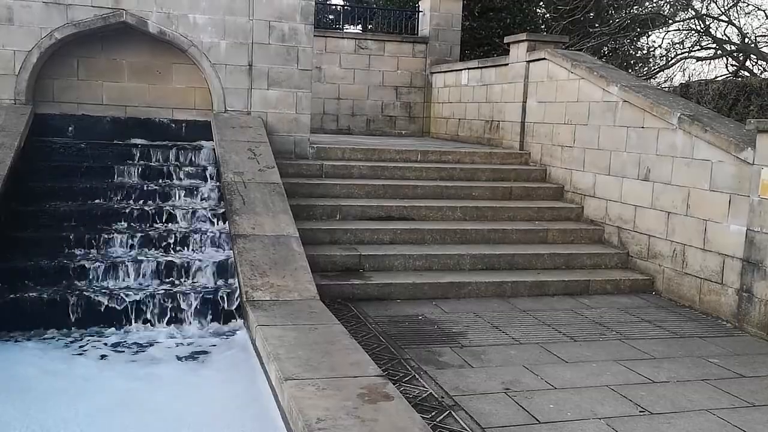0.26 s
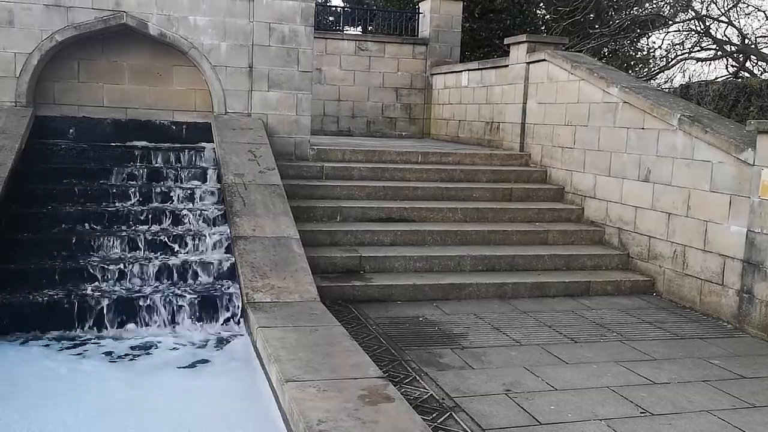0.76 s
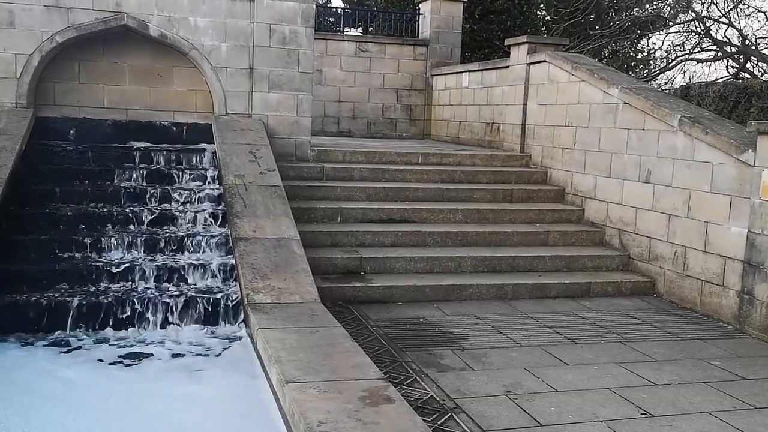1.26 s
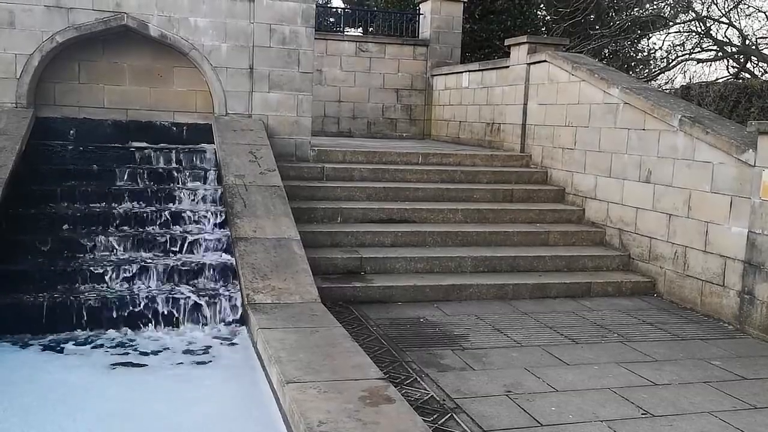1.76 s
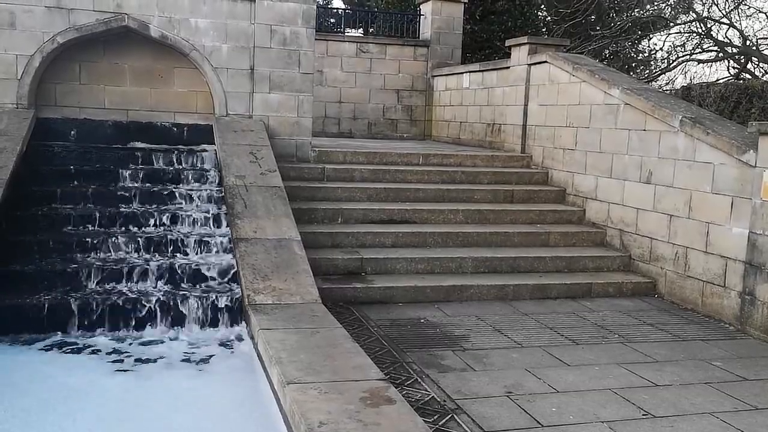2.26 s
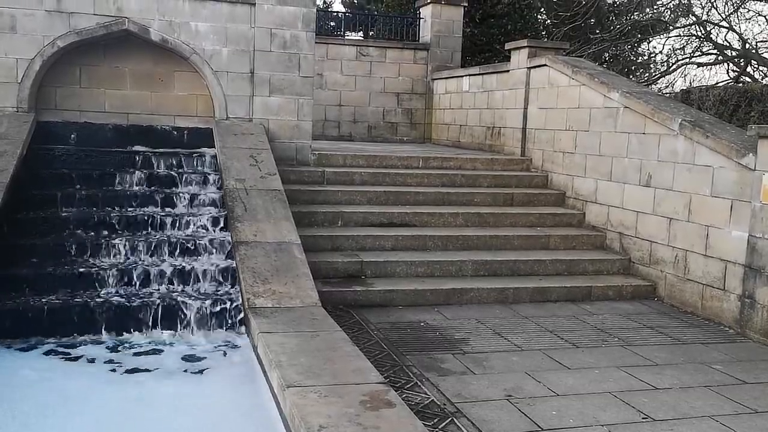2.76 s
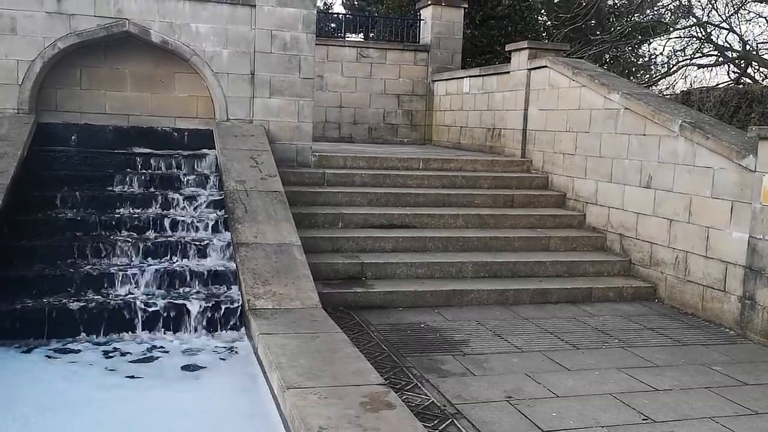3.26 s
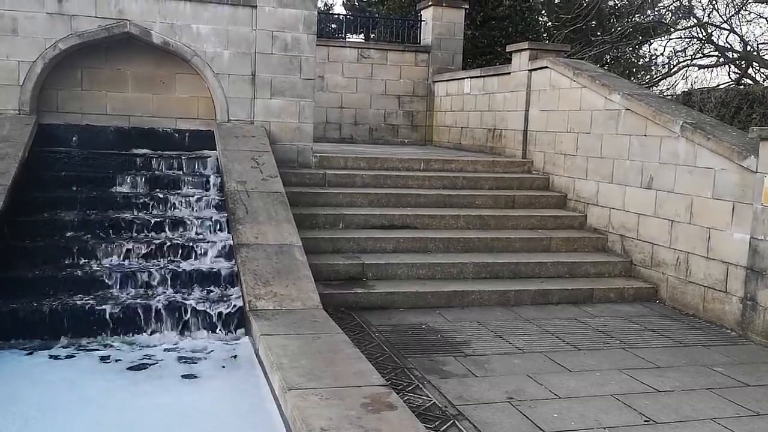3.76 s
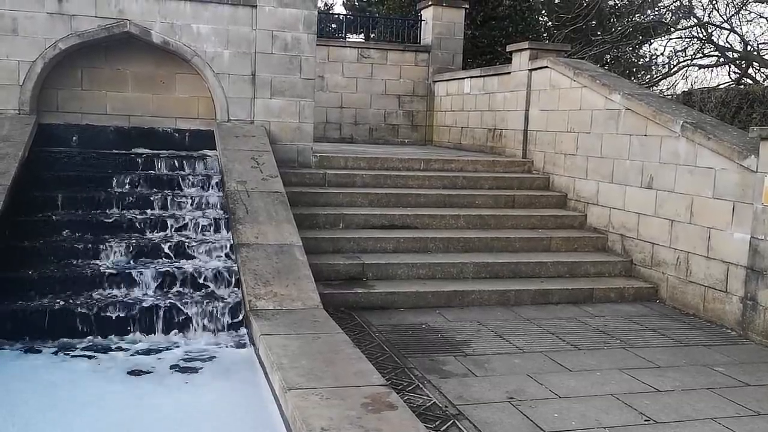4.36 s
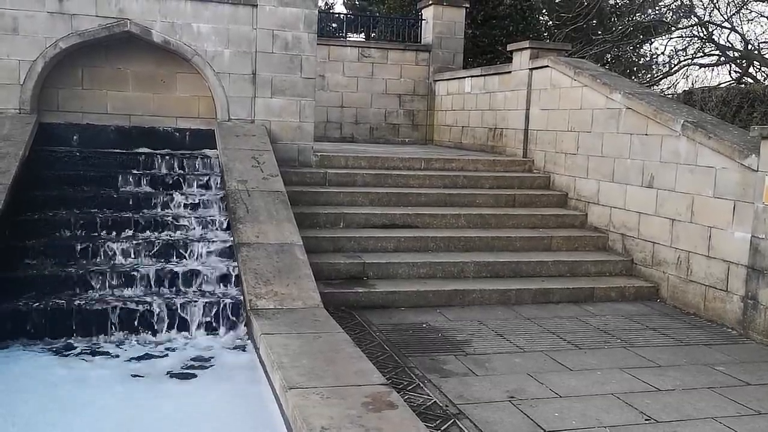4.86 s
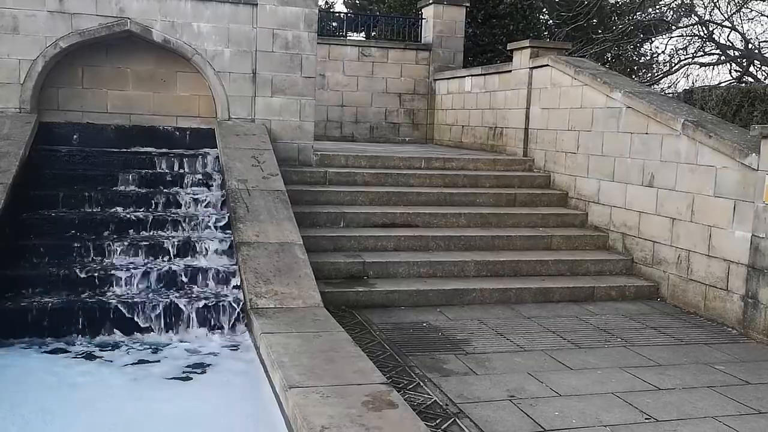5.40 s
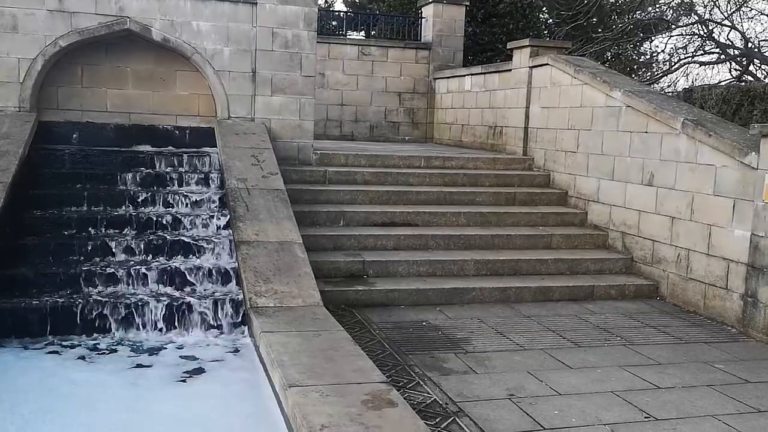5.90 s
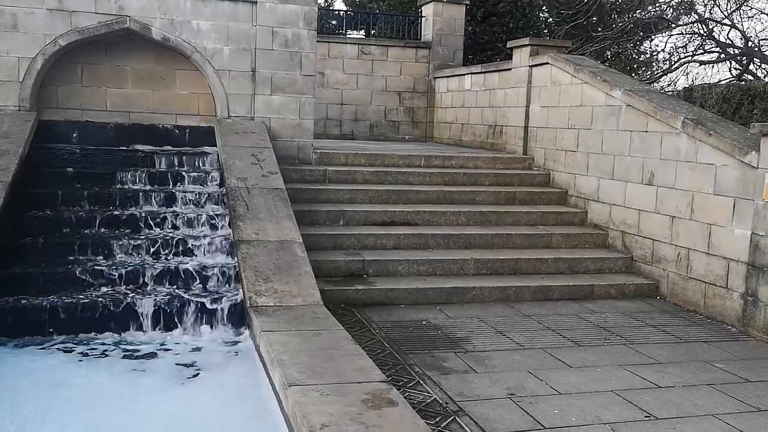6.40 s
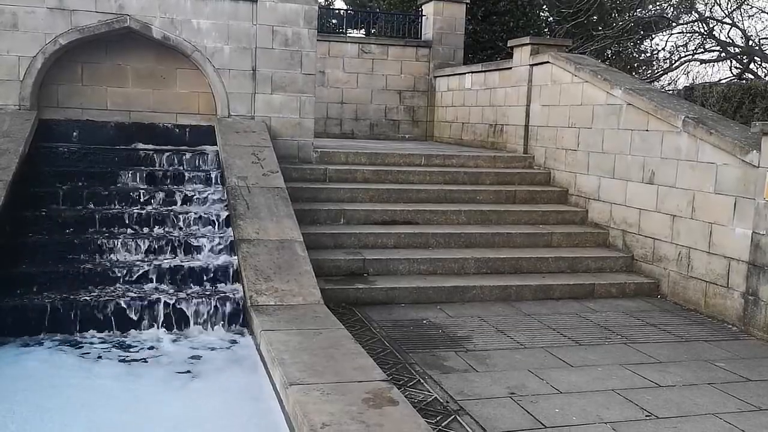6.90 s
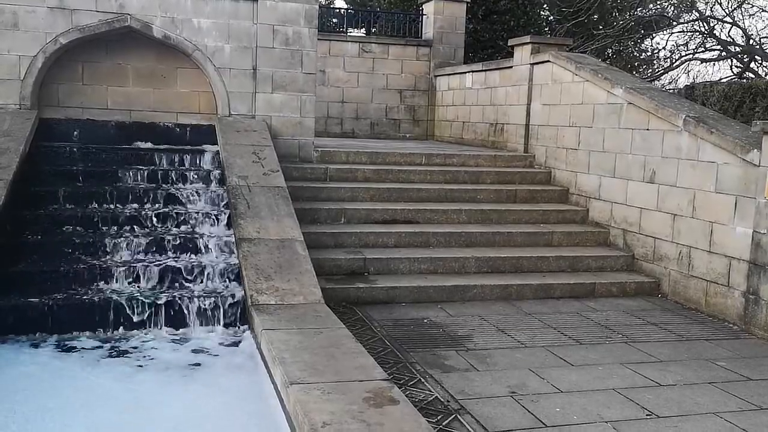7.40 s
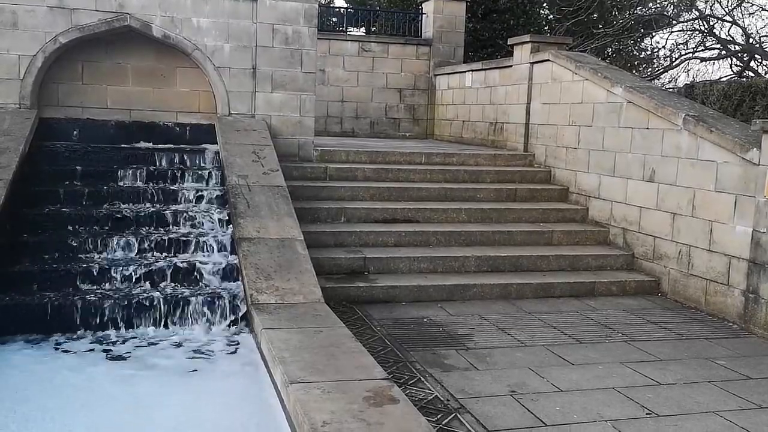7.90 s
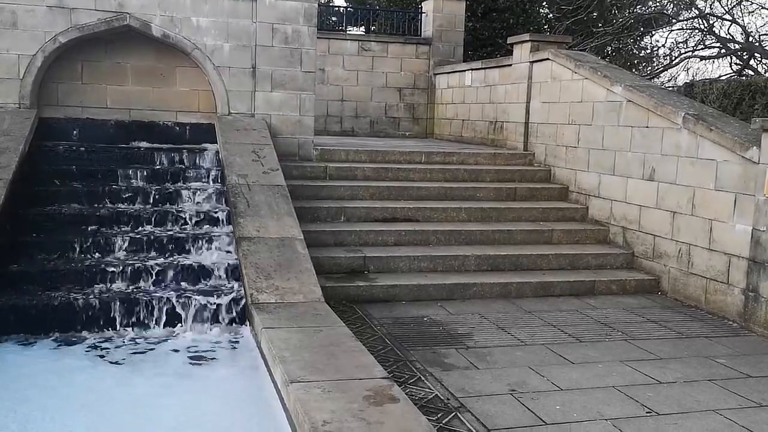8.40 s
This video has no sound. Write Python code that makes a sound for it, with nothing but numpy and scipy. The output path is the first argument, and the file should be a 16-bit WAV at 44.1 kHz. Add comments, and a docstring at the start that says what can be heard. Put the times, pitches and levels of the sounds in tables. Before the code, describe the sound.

Continuous splashing from a stepped fountain fills a wide stereo picture, lively in the mids, its highest treble softened. Single drops ring left and right. Low outdoor rumble, bumps of wind on the microphone and a few faint far knocks sit below. Three muffled, evenly spaced booms echo across the distance, momentarily ducking the water; very faint low hums appear from the third second on.

```python
"""A walled outdoor courtyard, where water tumbles down a flight of stone steps into a pool.
The cascade sums swarms of ringing bubbles, spray ticks and smooth wash; nearer drops splash and ring over it.
Filtered noise makes the low rumble; brief low swells make the puffs of breeze and the soft thuds.
Three dull far-off booms, about evenly spaced, swing, echo and roll; faint far hums set in later.
Loud moments pull down the recorder's gain, so it dips at the booms; the extreme treble is cut."""
import sys
import numpy as np
from scipy import signal
from scipy.fft import rfft, irfft, next_fast_len
from scipy.io import wavfile
from scipy.ndimage import uniform_filter1d

SR = 44100
rng = np.random.default_rng(int(sys.argv[2]) if len(sys.argv) > 2 else 0)


def bounce(signal):
    """Save signal as a 16-bit WAV file at the path given by the first command-line argument."""
    frames = np.transpose(np.atleast_2d(signal))
    limited = np.clip(frames, -1, 1)
    pcm = np.round(limited * 32767).astype(np.int16)
    wavfile.write(sys.argv[1], SR, pcm)


N = 381465
TIME = np.arange(N) / SR   # s


def from_db(db):
    """Amplitude ratio: twenty decibels are a factor of ten."""
    return 10 ** (np.asarray(db) / 20)


def rms_one(x):
    """Normalisation: scale the signal to unit root-mean-square."""
    return x / np.sqrt(np.mean(x ** 2) + 1e-20)


def in_time(rows):
    """Linear interpolation: a table over time, read at every sample."""
    return np.interp(TIME, *np.transpose(rows))


def per_bin(points):
    """Interpolation on a logarithmic frequency axis: a table over frequency, read at every FFT bin."""
    hz, value = np.transpose(points)
    bins_hz = np.fft.rfftfreq(next_fast_len(N), 1 / SR)
    return np.interp(np.log(bins_hz + 1e-3), np.log(hz), value)


def shaped(x, response):
    """Convolution theorem: filter by multiplying the spectrum by a response given per FFT bin."""
    size = next_fast_len(N)
    return irfft(rfft(x, size) * response, size)[..., :N]


def butter(x, hz, kind, order=2):
    """Butterworth filter: maximally flat in its passband."""
    corners_hz = np.clip(hz, 10, .45 * SR)
    return signal.sosfilt(signal.butter(order, corners_hz, kind, fs=SR, output="sos"), x)


def drift(rate):
    """Smooth random wander: noise low-passed at rate (Hz), with unit rms."""
    step = 40   # samples between the points of the slow curve
    r = np.exp(-2 * np.pi * rate * step / SR)
    white = rng.standard_normal(N // step + 2002)
    slow = signal.lfilter([1], [1, -2 * r, r * r], white)[2000:]   # drop the filter's settling
    return np.interp(np.arange(N) / step, np.arange(len(slow)), rms_one(slow))


def ring(clicks, hz, t60):
    """Damped resonance: each click starts an oscillation that falls by 60 dB in t60 seconds."""
    r = from_db(-60 / (t60 * SR))
    w = 2 * np.pi * hz / SR
    return signal.lfilter([1, 0, -1], [1, -2 * r * np.cos(w), r * r], clicks + 1e-18)


def even_noise(x, size):
    """Envelope division: take the slow level changes out of a noise, leaving rms near 1."""
    return x / np.sqrt(uniform_filter1d(x ** 2, size=size) + 1e-12)


def swell(s, db, hz, half_length_s, waver):
    """Gaussian wave packet: a few low swings, their phase wavering (in turns), rise and fall smoothly."""
    t = TIME[:SR] - .5
    unevenness = np.interp(t * hz, np.arange(-100, 100), rng.standard_normal(200))
    turns = hz * t + waver * unevenness
    envelope = np.sqrt(2) * from_db(db) * np.exp(-.5 * (t / half_length_s) ** 2)
    wave = envelope * np.cos(2 * np.pi * turns)
    return np.interp(TIME, s + t, wave, left=0, right=0)


def bubbles(per_s, spread_db, cycles, clump_db, clumps_per_s, count=26):
    """Resonance sets pitch by size: a swarm with small bubbles more numerous, even power per Hz, rms 1."""
    pitches = np.geomspace(350, 14000, count)
    shares = pitches ** .8 / np.sum(pitches ** .8)
    out = np.zeros(N)
    for hz, share in zip(pitches, shares):
        born = int(per_s * share * N / SR) + 1
        at, chance, sign = rng.random((born, 3)).T
        # each pitch has clumps of its own
        clumps = rng.standard_normal(int(clumps_per_s * N / SR) + 1)
        clump = clumps[(at * len(clumps)).astype(int)]
        sizes_db = spread_db * np.minimum(-np.log(1 - chance), 5) + clump_db * clump
        clicks = np.bincount((at * N).astype(int), from_db(sizes_db) * np.sign(sign - .5), N)
        out += np.sqrt(hz) * rms_one(ring(clicks, hz, cycles / hz))
    return rms_one(out)


def bubble(t, hz, cycles, rise):
    """A bubble's pitch climbs as it nears the surface, and damping takes 60 dB in the given cycles."""
    age = t * hz / cycles
    tone = np.sin(2 * np.pi * hz * t * (1 + rise * np.minimum(age, 1)))
    return tone * np.exp(-np.log(1000) * age)


def plinks(per_s, spread_db, cycles, rise):
    """Weaker damping: bubbles in the open pool ring longer than those in the foam; rms 1."""
    at, pitch, chance = rng.random((int(per_s * N / SR), 3)).T[:, :, None]
    hz = np.geomspace(900, 6000, 1000)[(pitch * 1000).astype(int)]
    lag = np.arange(SR // 25)
    sizes = hz * from_db(spread_db * np.minimum(-np.log(1 - chance), 4))
    notes = sizes * bubble(lag / SR, hz, cycles, rise)
    places = (at * N).astype(int) + lag
    return rms_one(np.bincount(places.ravel(), notes.ravel(), N)[:N])


def splashing(wash_db, spray_db, plink_db, slap_db, slap_rate):
    """Superposition in falling water: bubbles, sharp spray ticks and smooth wash thrown back by walls."""
    swarm = bubbles(per_s=12000, spread_db=2.5, cycles=15.4, clump_db=1.17, clumps_per_s=45)
    pool = from_db(plink_db) * plinks(per_s=240, spread_db=1.5, cycles=79, rise=0.047)
    ticks = (rng.random(N) < 700 / SR) * rng.standard_normal(N)   # about 700 per second
    spray = from_db(spray_db) * rms_one(butter(ticks, 2700, "high", order=1))
    # the sheet breaks into lumps that slap the steps
    direct = (swarm + spray) * from_db(slap_db * drift(slap_rate))
    wash = from_db(wash_db) * rng.standard_normal(N)
    return rms_one(direct + pool + wash)


def cascade(surge_db, surge_rate):
    """Partial coherence: both microphones share some splashing, the left first; the rest differs."""
    # relative colour of the water at each microphone: hz, density_db (per Hz)
    left_colour = [(420, -10.5), (640, -14), (900, -10.5), (1620, -13), (1830, -5.5), (2200, -11.5),
                   (2480, -6), (3000, -14.5), (3600, -12), (4400, -14), (5900, -23), (7700, -22.5),
                   (9000, -29), (14000, -38.5)]
    right_colour = [(400, -11), (660, -16.5), (1130, -11), (1450, -10.5), (1680, -4.5), (2330, -7),
                    (2650, -0.14), (3150, -10.5), (4100, -23), (6400, -26.5), (7600, -28.5), (8400, -35),
                    (10500, -33), (14000, -40)]
    # share of the water's power common to both microphones: hz, share (0-1)
    likeness = [(430, 0.95), (880, 0.29), (1150, 0.62), (1600, 0.03), (1800, 0.48), (2250, 0.13),
                (2550, 0.87), (3400, 0.25), (4100, 0.19), (5000, 0.44), (6000, 0.4), (9000, 0.4)]
    # phase by which the left microphone leads in the common part: hz, lead_rad
    left_lead = [(400, 1.18), (800, 1.86), (1400, 1.54), (1650, 2.5), (2150, 7.85), (2400, 8.12),
                 (3100, 11.74), (5300, 13), (5950, 14.2), (6500, 21.6), (8400, 29.67)]
    water_db = -35

    common, left, right = [splashing(wash_db=-0.5, spray_db=-5.5, plink_db=-7.0, slap_db=1.36,
                                     slap_rate=22.0) for _ in range(3)]
    alike = np.clip(per_bin(likeness), 0, 1)
    shared, own = np.sqrt(alike), np.sqrt(1 - alike)
    left_response = np.array([shared, own]) * from_db(per_bin(left_colour))
    left = shaped(np.array([common, left]), left_response).sum(axis=0)
    late = shared * np.exp(-1j * per_bin(left_lead))
    right_response = np.array([late, own]) * from_db(per_bin(right_colour))
    right = shaped(np.array([common, right]), right_response).sum(axis=0)
    water = rms_one(butter(np.array([left, right]), 110, "high"))
    return water * from_db(water_db + surge_db * drift(surge_rate))


def rumble(side_db, lump_db):
    """Long waves reach both microphones nearly alike: deep, lumpy outdoor noise."""
    # relative colour of the rumble: hz, density_db (per Hz)
    colour = [(6, -28), (12, -10.5), (25, -6), (45, -0.5), (70, -3.5), (100, -6.5), (140, -11.5),
              (210, -11.5), (270, -14.5), (330, -29), (500, -61)]
    # its level before the lumps: time_s, level_db
    level = [(0, -36.5), (2.5, -38), (5.4, -37), (6.8, -35.5), (8.65, -35.5)]
    response = from_db(per_bin(colour))
    mid, side = [rms_one(shaped(rng.standard_normal(N), response)) for _ in range(2)]
    stereo = mid + from_db(side_db) * side * [[1], [-1]]
    return stereo * from_db(in_time(level) + lump_db * drift(6.8))


def stray_drops():
    """Uniformly random arrivals: fainter drops, as rows with the columns of the near drops."""
    per_s, level_db, low_hz, high_hz = 11, -45.5, 1670, 3690
    splash_s, bubble_db, tick_db, pan_db = 0.0037, 2, -16, 7
    chances = rng.random((int(per_s * N / SR), 3))
    return [(when * TIME[-1], level_db, low_hz * (high_hz / low_hz) ** pitch,
             splash_s, bubble_db, tick_db, pan_db * (2 * side - 1)) for when, side, pitch in chances]


def drops(cycles, rise, attack_s):
    """Impact, then resonance: a drop lands with a bright tick and a short splash, and traps a bubble."""
    # nearest drops; bubble and tick are relative to the splash, splash_s is its decay time constant:
    # start_s, level_db, pitch_hz, splash_s, bubble_db, tick_db, left_minus_right_db
    near_drops = [(.061, -32, 1900, .005, 1, -22, -2), (.258, -33, 2800, .004, 4, -18, -2),
                  (.272, -35, 2770, .005, 2, -18, -4), (.73, -32, 1760, .0055, -4, -18, -5),
                  (1.168, -29.5, 3730, 0.0033, -2, -11, 8), (1.269, -29, 3300, 0.0032, 3, -16, 7),
                  (1.656, -35, 3700, 0.0046, -10, -4, 8), (2.338, -30, 2700, .004, -3, -20, 0),
                  (4.081, -36.5, 1180, .0044, -1, -5, 3), (4.113, -30.3, 4500, 0.0038, -18, -10, 11),
                  (4.146, -39, 1030, .004, -2, -20, -2), (4.490, -27, 1550, 0.0058, -7.5, -22, -8),
                  (5.401, -33, 1370, 0.0047, -2, -20, -2), (5.882, -26, 3300, .0045, -7, -17, 5),
                  (5.894, -41, 7300, .005, -1, -14, 5), (6.437, -34, 1760, .003, -1, -20, 7),
                  (7.040, -32, 2490, .004, 0, -16, -2), (7.812, -37, 2750, .003, 0, -20, 0),
                  (8.066, -27.5, 3700, 0.0018, -9, -9, 13)]
    out = np.zeros((2, N))
    t = TIME[:SR // 20]
    for s, db, hz, splash_s, bubble_db, tick_db, pan_db in near_drops + stray_drops():
        white = rng.standard_normal((2, len(t)))
        tick = from_db(tick_db) * rms_one(butter(white[::-1], [3500, 8000], "band"))
        body = rms_one(butter(white, [0.74 * hz, 1.1 * hz], "band"))
        splash = (body + tick) * np.exp(-t / splash_s)
        trapped = from_db(bubble_db) * bubble(t, hz, cycles, rise)
        drop = from_db(db) * (1 - np.exp(-t / attack_s)) * (splash + trapped)
        start = round(s * SR)
        out[:, start:start + len(t)] += drop[:, :N - start] * from_db([[pan_db / 2], [-pan_db / 2]])
    return out


def breeze_and_late_swings(waver):
    """Pressure fluctuation: breeze puffs and late swings of booms move both microphones in the bass."""
    # low swells on the microphones: puffs, and late swings of the first two booms (1.194 and 3.945 s):
    # centre_s, level_db, pitch_hz, half_length_s
    low_swells = [(0.185, -27.5, 44, .048), (0.185, -30.5, 88, 0.04), (0.36, -23, 62.6, 0.0041),
                  (0.519, -33.5, 43.6, 0.024), (0.59, -32.5, 61.5, 0.012), (0.716, -32.5, 44.8, 0.036),
                  (2.425, -27.5, 57.7, 0.009), (1.194, -29, 85, .006), (3.945, -27.5, 38, 0.013),
                  (4.195, -28.5, 66.4, 0.0077), (4.379, -35, 41.6, 0.035), (4.979, -31, 35, .03),
                  (4.996, -33, 76, 0.03), (6.557, -32, 35, 0.044), (6.928, -30.5, 48, 0.01),
                  (7.821, -38, 53, 0.1), (8.10, -36, 32, .03), (8.174, -30.5, 56.6, 0.029),
                  (8.614, -31, 49.3, 0.024)]
    return sum(swell(s, db, hz, half_length_s, waver) for s, db, hz, half_length_s in low_swells)


def thuds(waver):
    """Propagation blurs transients: small far-off knocks become brief low swells."""
    # soft far-off knocks: centre_s, level_db, pitch_hz
    knocks = [(.81, -36, 145.4), (4.47, -40, 199), (5.42, -41, 196), (5.633, -35, 148), (5.969, -35.5, 205),
              (6.259, -41, 193.4), (8.109, -37.5, 144)]
    return sum(swell(s, db, hz, half_length_s=0.029, waver=waver) for s, db, hz in knocks)


def booms(echo_waver, roll_lump_db):
    """Only bass carries far: a blow pushes, rebounds, rings, echoes and rolls away unevenly."""
    # far blows: centre_s, blow_db, ring_db, echo_db, pitch_hz, rebound_delay_s
    blows = [(1.038, -23.5, -26, -28, 85, 0.0064), (3.817, -18, -30, -27.5, 169, .011),
             (6.622, -18, -28.5, -24.5, 165, 0.01136)]
    # echoes after every blow, level relative to its echo_db: delay_s, level_db, pitch_hz, half_length_s
    echoes = [(.048, 1, 140, 0.0061), (.066, -3.5, 172, 0.0073), (.079, 0.5, 95, 0.012),
              (.094, -4, 152, 0.0083), (0.096, -12.5, 244, .015), (.128, -1, 56, 0.008),
              (0.165, -8, 80.6, .010)]
    # bands of the roll, level relative to echo_db: low_hz, high_hz, level_db, decay_s (time constant)
    roll_bands = [(55.4, 110, -9, 0.24), (130, 280, -11, 0.24)]
    roll_attack_s, blow_half_length_cycles = 0.013, 0.42
    ring_hz, ring_delay_s, ring_half_length_s = 216, 0.0241, 0.01

    out = np.zeros(N)
    rolls = []
    for low_hz, high_hz, _, _ in roll_bands:
        band = butter(rng.standard_normal(N), [low_hz, high_hz], "band", order=4)
        rolls.append(even_noise(band, size=1800) * from_db(roll_lump_db * drift(15)))
    for s, blow_db, ring_db, echo_db, hz, rebound_s in blows:
        half_length = blow_half_length_cycles / hz
        push = swell(s, blow_db, hz, half_length, waver=0)
        pull = swell(s + rebound_s, blow_db, hz, half_length, waver=0)
        # a brief hollow ringing follows the blow
        hollow = swell(s + ring_delay_s, ring_db, ring_hz, ring_half_length_s, echo_waver)
        out += push - pull + hollow
        for delay_s, db, echo_hz, half_length_s in echoes:
            out += swell(s + delay_s, echo_db + db, echo_hz, half_length_s, echo_waver)
        t = np.maximum(TIME - s, 0)
        for roll, (_, _, db, decay_s) in zip(rolls, roll_bands):
            envelope = (1 - np.exp(-t / roll_attack_s)) * np.exp(-t / decay_s)
            out += roll * from_db(echo_db + db) * envelope
    return out


def hum():
    """Frequency modulation: faint far tones waver slightly in pitch as they set in, hold and fade."""
    # far tones: start_s, hold_s, level_db, pitch_hz
    tones = [(2.7, 2.8, -45.5, 66.73), (6.75, 0.89, -45.5, 112.6), (6.735, 0.16, -49.5, 173.6)]
    attack_s, release_s, waver = 0.15, 0.14, 0.0061   # waver is a fraction of the pitch
    out = np.zeros(N)
    for s, hold_s, db, hz in tones:
        corners = s + np.cumsum([0, attack_s, hold_s, release_s])
        envelope = np.interp(TIME, corners, [0, 1, 1, 0])
        pitch_hz = hz * (1 + waver * drift(2.27))
        tone = np.sin(2 * np.pi * np.cumsum(pitch_hz) / SR)
        out += np.sqrt(2) * from_db(db) * envelope * tone
    return out


def from_the_left(x):
    """Arrival-time difference: the low sounds reach the right microphone a little later."""
    lag_s = 0.000256
    return np.array([x[0], np.interp(TIME - lag_s, TIME, x[1])])


def scene():
    """Superposition: the water over the low sounds of the surroundings."""
    water = cascade(surge_db=0.4, surge_rate=6.3)
    near = drops(cycles=85, rise=0.046, attack_s=.0005)
    ground = rumble(side_db=-40, lump_db=1.13)
    low_swells = breeze_and_late_swings(waver=0.13)
    far = thuds(waver=0.11) + booms(echo_waver=0.048, roll_lump_db=2.0) + hum()
    return water + near + from_the_left(far + low_swells + ground)


def gain_control(x, threshold_db, slope, release_db_per_s):
    """Dynamic range compression: loud moments pull the gain down; it recovers at a steady pace."""
    power = uniform_filter1d(np.mean(x ** 2, axis=0), size=700)
    level = 10 * np.log10(power + 1e-12)
    recovery = release_db_per_s * TIME
    cut = slope * np.maximum(level - threshold_db, 0)
    held = np.maximum.accumulate(cut + recovery) - recovery
    return x * from_db(-uniform_filter1d(held, size=300))


def record(dry):
    """Compression and band limiting: gain control, then a steep low-pass at 13.9 kHz."""
    levelled = gain_control(dry, threshold_db=-23.0, slope=1.0, release_db_per_s=12.0)
    low_pass = signal.ellip(10, .2, 80, 13900, fs=SR, output="sos")
    return signal.sosfilt(low_pass, levelled)


dry = scene()
out = record(dry)
bounce(out)
```